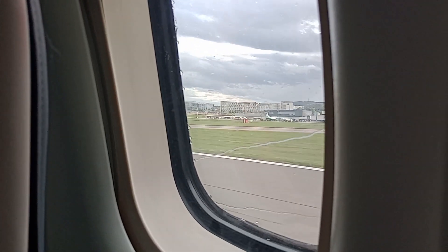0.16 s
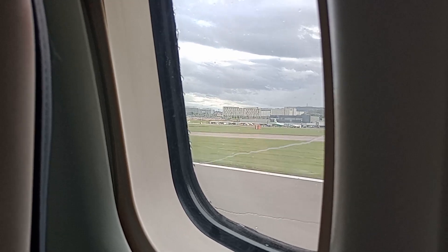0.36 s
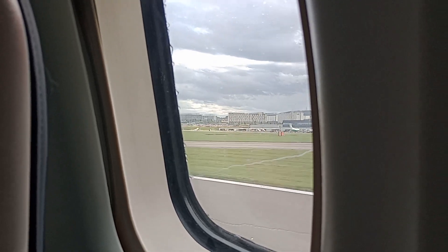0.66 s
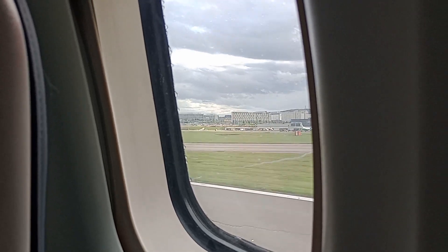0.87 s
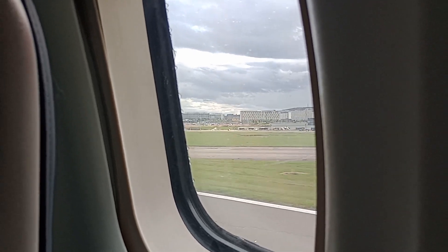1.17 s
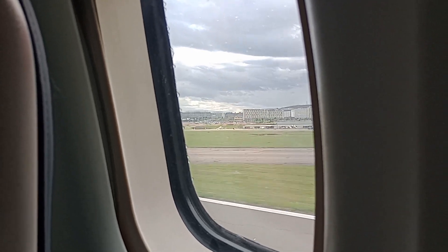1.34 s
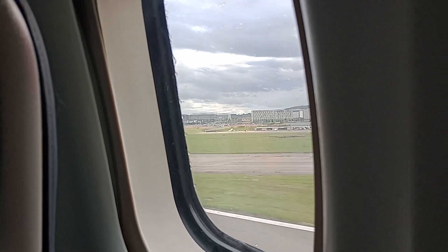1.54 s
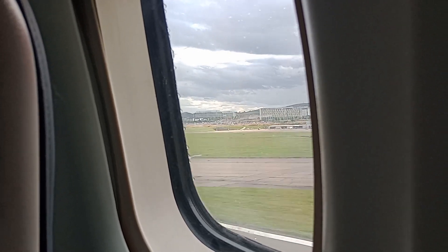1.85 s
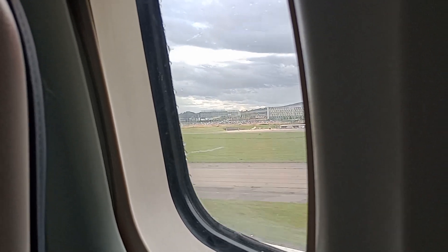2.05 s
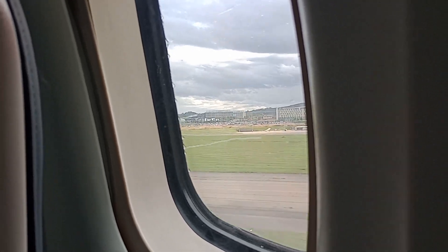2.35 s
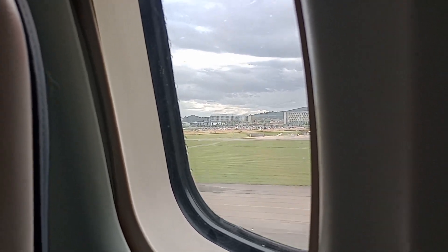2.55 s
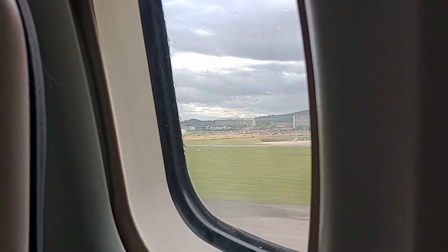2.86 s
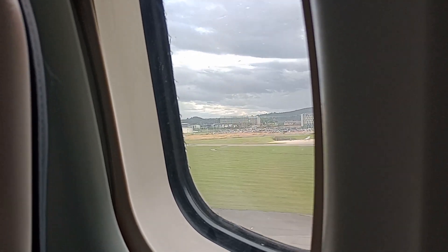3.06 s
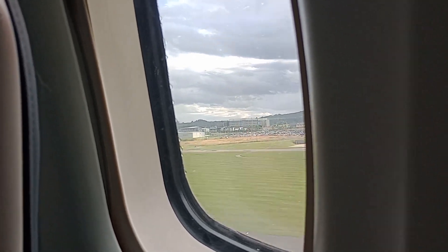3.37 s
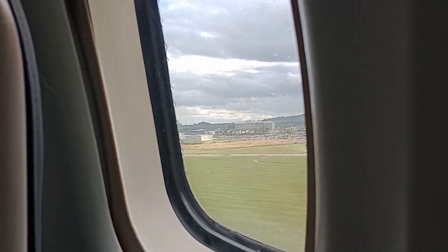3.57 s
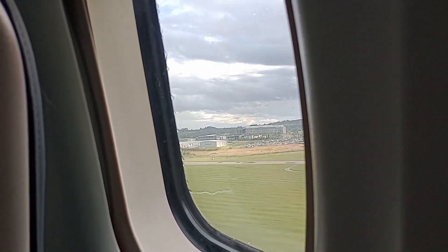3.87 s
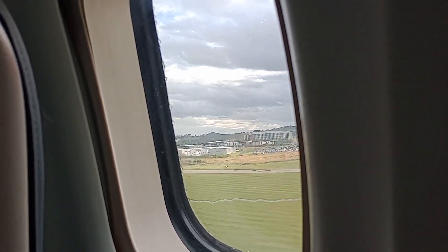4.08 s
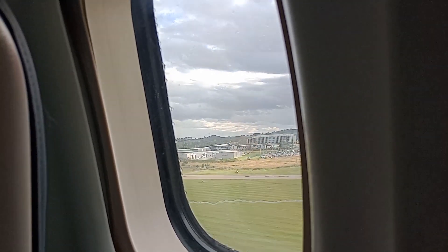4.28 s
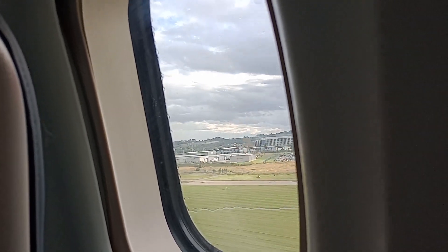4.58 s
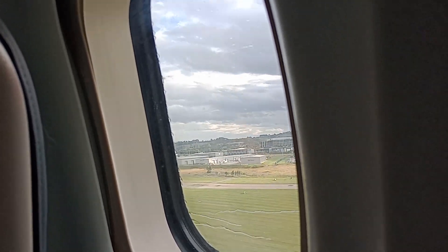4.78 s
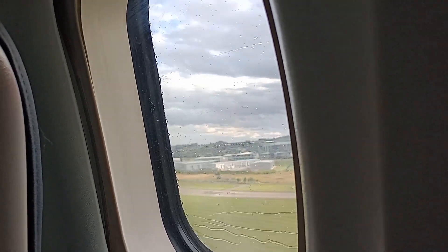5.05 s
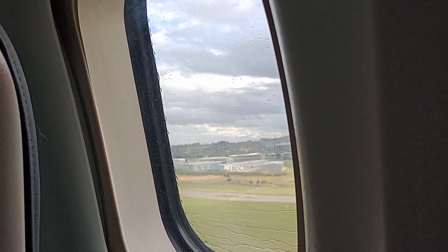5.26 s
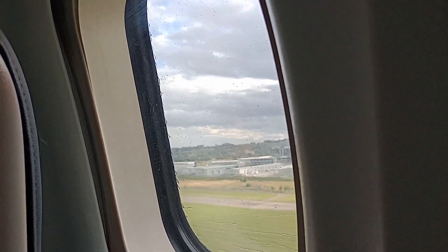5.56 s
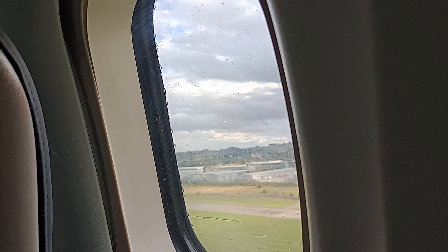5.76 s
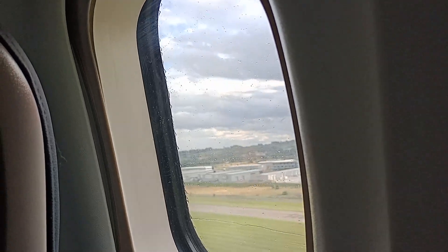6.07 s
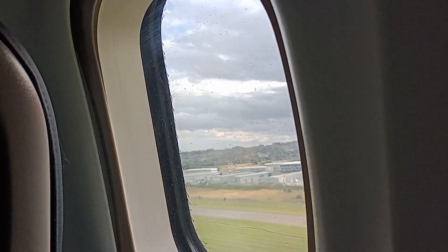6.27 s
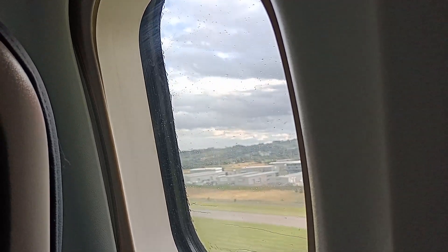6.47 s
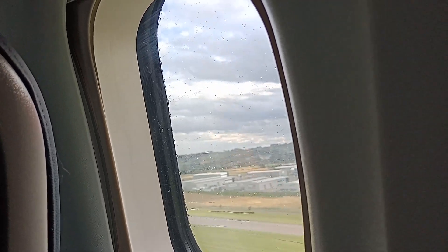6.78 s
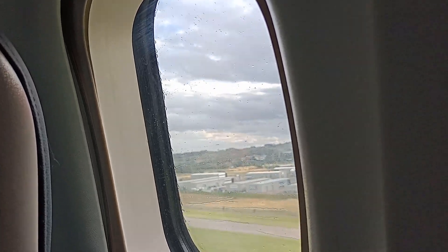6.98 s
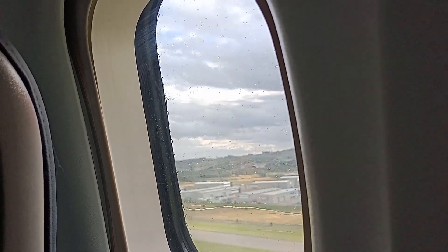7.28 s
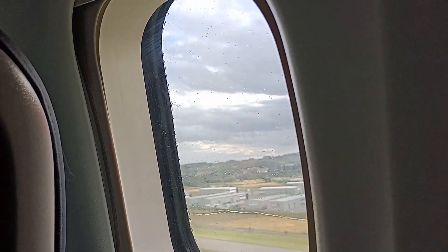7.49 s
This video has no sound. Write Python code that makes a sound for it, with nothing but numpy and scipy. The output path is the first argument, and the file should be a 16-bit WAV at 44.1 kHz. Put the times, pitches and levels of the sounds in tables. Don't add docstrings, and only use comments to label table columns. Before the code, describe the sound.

From beside a cabin window, continuous takeoff noise: a low steady hum from the propellers, heaving structural rumble, mid-range roar and bright slipstream hiss. A few dry plastic ticks crack early and more near the middle. After a sharp rattle and knock late on, the ground rumble is weaker and the drone feels smoother, with a faint whistle rising at the end. Enclosed, dense, close sound.

```python
import sys
import numpy as np
from scipy import signal
from scipy.fft import rfft, irfft, next_fast_len
from scipy.io import wavfile
from scipy.ndimage import uniform_filter1d, map_coordinates

SR = 44100
rng = np.random.default_rng(int(sys.argv[2]) if len(sys.argv) > 2 else 0)


def file_out(sig):
    cols = np.atleast_2d(sig).T
    lim = np.clip(cols, -1, 1)
    pcm = np.round(lim * 32767).astype(np.int16)
    wavfile.write(sys.argv[1], SR, pcm)


def ratio(d):
    e = np.asarray(d, float) / 20
    return 10 ** e


N = 336483

# t/s, f/Hz
BLADE_RATE = [(0, 120.1), (2, 120.0), (5.5, 119.93), (6.2, 119.75), (6.9, 119.85), (7.63, 120.1)]


def unit(x):
    return x / np.sqrt(np.mean(x ** 2) + 1e-20)


def curves(rows):
    times, *columns = np.transpose(rows)
    return [np.interp(np.arange(N) / SR, times, column) for column in columns]


def wobble(rate):
    knots = rng.standard_normal(int(N / SR * 300) + 4)
    return map_coordinates(knots, [np.arange(N) * min(rate, 300) / SR])


def swells(rows, rise_s, fall_s):
    times, *columns = np.transpose(rows)
    grid = np.arange(0, N + 64, 64)
    late = grid / SR - times[:, None]
    bells = np.exp(-(late / np.where(late < 0, rise_s, fall_s)) ** 2)
    return [np.interp(np.arange(N), grid, column @ bells) for column in columns]


def coloured(x, spectrum, resonances=()):
    size = next_fast_len(len(x) + 8192)
    hz = np.fft.rfftfreq(size, 1 / SR)
    f, db = np.transpose([(1, -120)] + spectrum + [(SR / 2, -120)])
    level = np.interp(np.log(hz + 1), np.log(f + 1), db)
    for centre, width, hump_db in resonances:
        level += hump_db / (1 + (2 * (hz - centre) / width) ** 2)
    return irfft(rfft(x, size) * ratio(level), size)[:len(x)]


def rush(spectrum, patchy_db, resonances=(), streaky_db=0.):
    def blurred(shape, bins, frames):
        across = uniform_filter1d(rng.standard_normal(shape), size=bins, axis=0)
        return unit(uniform_filter1d(across, size=frames, axis=1))

    z = signal.stft(rng.standard_normal(N), nperseg=512)[2]
    patches = blurred(z.shape, 6, 10)
    streaks = blurred(z.shape, 3, 220)
    z = z * ratio(patchy_db * patches + streaky_db * streaks)
    noise = signal.istft(z, nperseg=512)[1][:N]
    return unit(coloured(noise, spectrum, resonances))


def tone(hz, db, flutter_db=0., drift_hz=0., pace=8.):
    turns = np.cumsum(hz + drift_hz * wobble(pace)) / SR + rng.random()
    return np.sqrt(2) * ratio(db + flutter_db * wobble(pace)) * np.sin(2 * np.pi * turns)


def blade_angle():
    return 2 * np.pi * np.cumsum(curves(BLADE_RATE)[0]) / SR


def propellers():
    # t/s, blade tone level/dB
    drumming = [(0.06, -13.5), (0.31, -17.5), (0.58, -11.5), (0.93, -14), (1.98, -11.5), (2.08, -14.5),
                (2.21, -12), (2.35, -16.5), (2.46, -12), (2.58, -15), (2.77, -13), (2.9, -14.5),
                (3.02, -13.5), (3.73, -17.5), (3.96, -11.5), (4.04, -16), (5.55, -13), (7.55, -12.5)]
    # t/s, second overtone level/dB
    peaking = [(0, -34), (.3, -23), (.55, -34.5), (.75, -28.5), (1.1, -40), (1.7, -29.5), (2.62, -39.5),
               (3.2, -34), (4.1, -36), (4.94, -30), (5.5, -34.5), (7.3, -33)]
    angle = blade_angle()
    peak_db = curves(peaking)[0]
    third_db = (peak_db + peak_db.mean()) / 2 - 8.5 + 3 * wobble(14)
    first = ratio(curves(drumming)[0] + 1.18) * np.cos(angle)
    second = ratio(peak_db + 1 + 1.5 * wobble(8)) * np.cos(2 * angle + .7 + .3 * wobble(6))
    third = ratio(third_db) * np.cos(3 * angle + 1.5 * wobble(16))
    return np.sqrt(2) * (first + second + third)


def airframe():
    # f/Hz, level/dB per Hz
    heave_band = [(20, -26), (45, -38), (53, -16), (59, -8), (72, -6.5), (90, -7.5), (104, -0.5),
                  (130, -32)]
    rumble_band = [(75, -49), (100, -3.5), (138, 2), (192, -4), (205, -4.5), (222, -6.5), (260, -8.5),
                   (308, -9), (330, -14), (430, -20), (600, -56)]
    roar_band = [(300, -36), (430, -1), (520, -3), (620, -4), (800, -9.5), (980, -9.5), (1300, -16.5),
                 (1500, -16.5), (2000, -23.5), (2600, -50)]
    hiss_band = [(1500, -30), (2100, -1), (3000, 0), (3700, -4.5), (6000, -5), (8400, -6), (10000, -5),
                 (11000, -6), (13000, -10), (15700, -13)]
    # f/Hz, width/Hz, level/dB
    panels = [(4210, 150, 3.5), (4430, 73, 9), (4634, 145, 7.5), (4920, 60, 5.5), (5380, 200, 4),
              (6720, 360, 6), (7200, 250, 2), (7760, 320, 3.5), (8900, 200, 0.5), (9400, 530, 5.5),
              (10100, 200, -2), (10200, 250, 1.5), (12700, 50, 4), (14200, 600, 3)]
    # t/s, rise/dB
    sways = [(.06, 3), (.72, 4), (1.2, 5), (1.45, 4), (2.17, 1), (2.4, 3), (2.69, 3), (3.04, 8), (3.3, 5),
             (3.87, 3), (4.08, 1), (4.35, 5), (5.36, 4.5), (5.67, 5), (6.32, -2)]
    # t/s, rise/dB
    thuds = [(.31, 2), (.97, 1.5), (1.41, 1.5), (2.69, 0.5), (5.61, 4.5), (5.74, 2.5), (6.61, -1.5)]
    # t/s, roar rise/dB, hiss rise/dB
    shudders = [(.04, 1.5, 0), (.5, 1.5, 0), (.98, 5, 1), (2.42, 2.5, 2.5), (2.74, 0, 0), (3.16, 1, 1),
                (3.7, 0.5, 1.5), (4.08, 0.5, 1.5), (4.37, 1.5, 1), (5.17, 2.5, 0.5), (5.27, 3, 0.5),
                (5.37, 3, 1), (5.52, 0.5, 1.5), (5.88, 3, 1), (6.48, 2.5, .5), (6.91, 3.5, 1),
                (7.2, 2.5, 1.5), (7.4, 2, 1.5)]

    airborne = curves([(4.2, 0), (6.3, 1)])[0]
    sway_db, = swells(sways, rise_s=.094, fall_s=.094)
    thud_db, = swells(thuds, rise_s=.1, fall_s=.038)
    shudder_db, leak_db = swells(shudders, rise_s=.085, fall_s=.04)
    heave_db = -32.5 + 3 * airborne + sway_db
    rumble_db = -21 - 3.5 * airborne + thud_db + .42 * wobble(9)
    roar_db = -39.5 - airborne + .17 * thud_db + shudder_db
    hiss_db = -47.5 + leak_db
    heave = ratio(heave_db) * rush(heave_band, patchy_db=-1.3)
    rumble = ratio(rumble_db) * rush(rumble_band, patchy_db=.8)
    shake = wobble(15)
    roar = ratio(roar_db + .26 * shake) * rush(roar_band, patchy_db=.3)
    hiss = rush(hiss_band, patchy_db=.46, resonances=panels, streaky_db=1)
    return heave + rumble, roar + ratio(hiss_db + .69 * shake) * hiss


def machinery():
    # t/s, level/dB
    mesh_level = [(0, -61), (0.55, -64), (1.2, -58), (2.2, -58.5), (3.4, -55.5), (4.05, -54), (4.6, -55.5),
                  (5.35, -53.5), (5.92, -56), (6.01, -63), (7, -67), (7.63, -59)]
    # t/s, f/Hz
    mesh_pitch = [(0, 6703), (3, 6692), (7.63, 6688)]
    # offset/Hz, level/dB
    sidebands = [(-120, -24), (-20.5, -12), (0, 1.3), (116, -17)]
    # t/s, level/dB
    compressor = [(0, -72.5), (0.72, -70), (1.93, -68), (2.23, -66), (3.25, -64), (3.7, -58), (4.69, -63.5),
                  (5.5, -63), (6.91, -60), (7.63, -56)]
    # t/s, f/Hz, level/dB
    seal_whistle = [(0, 945, -52.5), (2.6, 969, -52.5), (3, 973, -55.5), (5.3, 990, -55), (5.7, 992, -64),
                    (6.8, 997, -62), (7.1, 999, -48), (7.63, 998, -47)]
    # t/s, f/Hz, level/dB
    pump_hum = [(0, 1456, -66), (2.5, 1458, -65), (5.2, 1440, -72), (5.7, 1425, -63), (7.63, 1421, -64)]
    # f/Hz, level/dB
    accessories = [(480, -53), (1746, -72), (3306, -73), (3793, -78), (4428, -72)]

    mesh_hz, mesh_db = curves(mesh_pitch)[0], curves(mesh_level)[0]
    gear = sum(tone(mesh_hz + offset, mesh_db + db, flutter_db=.9, drift_hz=1.5, pace=25)
               for offset, db in sidebands)
    whine = tone(9706, curves(compressor)[0] + .7, flutter_db=1.4, drift_hz=3, pace=30)
    seal = tone(*curves(seal_whistle), flutter_db=1.8, drift_hz=4.5, pace=30)
    pump = tone(*curves(pump_hum), flutter_db=1.5, drift_hz=2)
    faint = sum(tone(hz, db, flutter_db=3.0, drift_hz=3.04) for hz, db in accessories)
    return gear + whine + comb(mesh_hz) + seal + pump + faint


def comb(mesh_hz):
    # t/s, level/dB
    comb_level = [(0, -61), (0.6, -68), (1.1, -70), (1.76, -57), (2.3, -65), (3.4, -68), (3.74, -60.5),
                  (4.5, -60.5), (6.1, -64), (7.63, -63)]
    # blade multiples from the carrier, level/dB
    comb_lines = [(-1, 0), (0, -4), (1, -12), (2, -1), (3, -3), (4, -2.5)]
    carrier = 2 * np.pi * np.cumsum(mesh_hz * 8850 / 6690 + 4 * wobble(12)) / SR
    blade = blade_angle()
    lines = 0
    for multiple, db in comb_lines:
        phase = carrier + round(multiple) * blade + .5 * wobble(25)
        lines = lines + ratio(db - 3 + 3.5 * wobble(9)) * np.sin(phase)
    return ratio(curves(comb_level)[0]) * lines


def trim():
    # t/s, dull level/dB, bright level/dB, t60/s
    ticks = [(.471, -31, -27, .004), (.738, -34, -35, .004), (.749, -30, -48.5, .03), (2.41, -40, -46, .03),
             (2.946, -37, -50, .05), (4.013, -38, -42, .004), (4.061, -33, -40, .04),
             (4.377, -32, -50, .045), (4.703, -38, -42.5, .02), (5.114, -34, -50, .035),
             (5.232, -33, -50, 0.017), (5.609, -36, -38, .02), (5.62, -34, -25, 0.0057),
             (5.644, -38, -50, .01), (5.876, -39, -46, .01), (7.4, -35.5, -38, 0.014),
             (7.414, -50, -32, 0.0045), (7.423, -50, -38, .005)]
    # f/Hz, level/dB per Hz
    dull_band = [(700, -20), (1800, 0), (6000, -2), (9000, -20)]
    bright_band = [(5000, -23), (7500, -8), (9500, 2), (11000, 3.5), (12500, -8), (15700, -5)]
    dull, bright = np.zeros(N + SR), np.zeros(N + SR)
    t = np.arange(SR // 20) / SR
    cracks = rng.standard_normal((len(ticks), len(t)))
    for (s, dull_db, bright_db, t60), crack in zip(ticks, cracks):
        t60 = max(t60, .002)
        onset = 1 - np.exp(-t / (.069 * t60))
        crack = ratio(-60 * t / t60) * onset * crack
        start = round(s * SR)
        dull[start:][:len(t)] += ratio(dull_db + 3.5) * crack
        bright[start:][:len(t)] += ratio(bright_db + 5.5) * crack
    return coloured(dull[:N], dull_band) + coloured(bright[:N], bright_band)


def mesh_haze():
    # f/Hz, level/dB per Hz
    haze_band = [(12900, -40), (13230, -3), (13380, 0), (13520, -6), (13900, -40)]
    opens_s, shuts_s, ease_s = .65, 4.8, .5
    shut = curves([(opens_s - ease_s / 2, 1), (opens_s + ease_s / 2, 0),
                   (shuts_s - ease_s, 0), (shuts_s + 2 * ease_s, 1)])[0]
    level_db = -67 - 4.5 * shut + .7 * wobble(1.4) + 1.5 * wobble(30)
    return ratio(level_db) * rush(haze_band, patchy_db=1.1)


def jolt():
    # t/s, half length/s, depth 0-1, knock level/dB
    bump = (5.62, .010, .92, -26)
    # f/Hz, level/dB per Hz
    knock_band = [(250, -30), (420, 0), (620, -1), (760, -13), (1300, -28), (2000, -45)]
    s, half_s, depth, knock_db = bump
    loose = np.exp(-((np.arange(N) / SR - s) / half_s) ** 2)
    knock = ratio(knock_db) * loose * rush(knock_band, patchy_db=0)
    return 1 - depth * loose, knock


def scene():
    contact, knock = jolt()
    low, high = airframe()
    through_wall = contact * (propellers() + low)
    return (through_wall + knock + high + mesh_haze() + machinery() + trim())[None]


def top_cut(x):
    return signal.sosfilt(signal.butter(12, 15780, fs=SR, output="sos"), x)


def record(dry):
    keep = np.exp(-1 / (.022 * SR))
    ahead = np.pad(dry ** 2, ((0, 0), (0, 260)), "edge")[:, 260:]
    power = signal.lfilter([1 - keep], [1, -keep], ahead, zi=[[keep * ratio(-22)]])[0]
    power = uniform_filter1d(power, size=184)
    gain = (power / ratio(-21.0)) ** -.17
    ending = np.clip((N - np.arange(N)) / 130, 0, 1)
    return top_cut(ending * dry * gain)


dry = scene()
out = record(dry)
file_out(out)
```